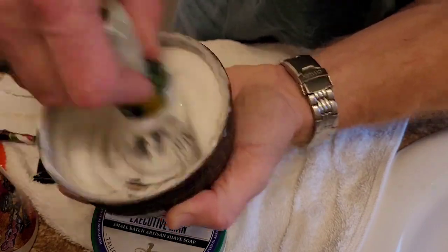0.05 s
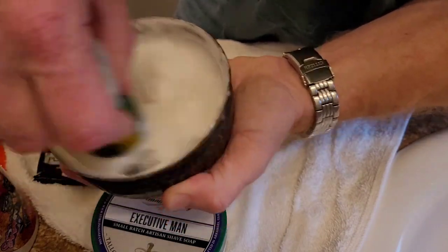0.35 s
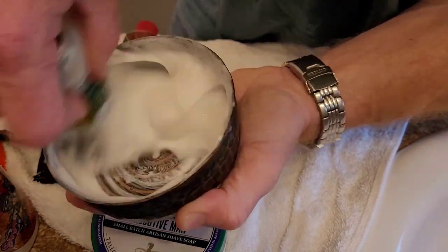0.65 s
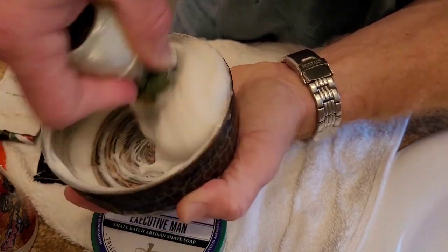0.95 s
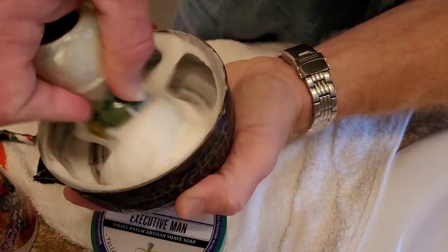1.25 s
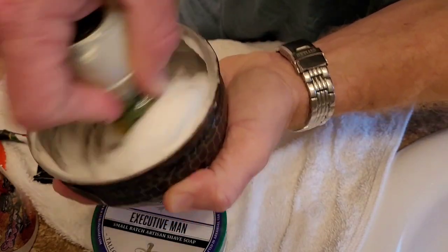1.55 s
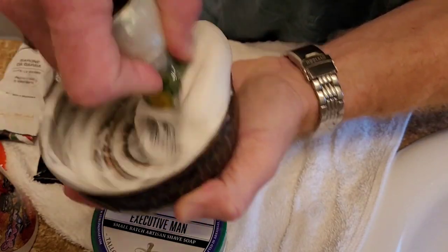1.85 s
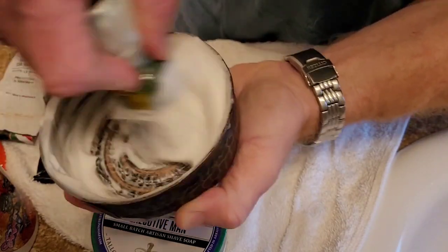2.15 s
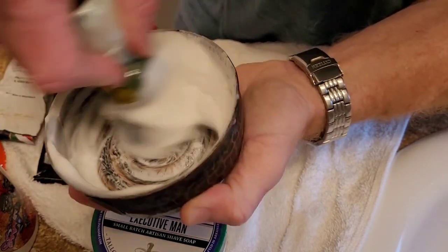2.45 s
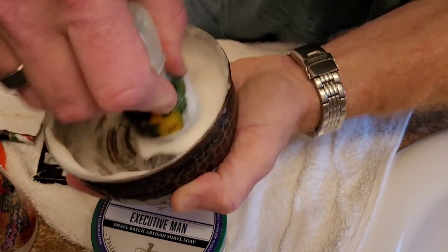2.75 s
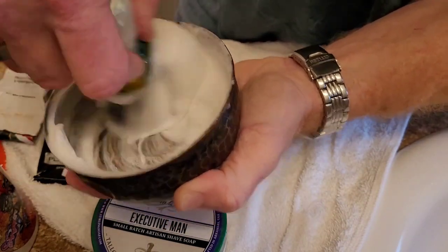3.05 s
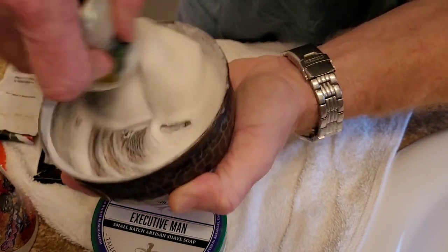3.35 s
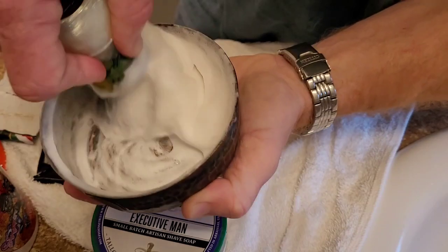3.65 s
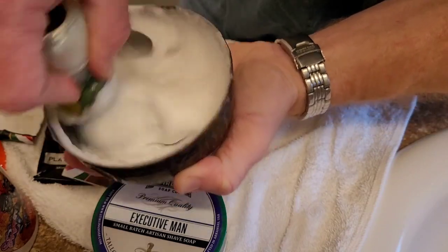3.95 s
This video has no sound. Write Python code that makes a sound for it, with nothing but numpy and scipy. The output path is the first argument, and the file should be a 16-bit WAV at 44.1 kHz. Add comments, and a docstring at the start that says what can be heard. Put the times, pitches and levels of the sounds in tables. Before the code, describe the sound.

A shaving brush swishes lather in a ceramic bowl throughout four seconds, in soft, uneven squelches with a fine fizz. The handle knocks the bowl sharply at about 1.4 seconds, clinks brightly on the rim at 3.2, and clatters more softly at 3.6. Faint watch strap ticks come from the right, and the bowl rubs dully against a palm. Everything is close, in a small, quiet room.

```python
"""A small room, close up: a shaving brush whips lather in a hand-held ceramic bowl.
Each sweep bursts countless tiny bubbles: a wet squelch coloured by the bowl's hollow, with a fine
fizz of bristles on top. A metal watch strap ticks on the right, the bowl rubs in the palm, and the
handle knocks its wall and rim. One soft low bump passes; quiet room tone lies under it all."""
import sys
import numpy as np
from scipy import signal
from scipy.fft import rfft, irfft
from scipy.io import wavfile

SR = 44100
rng = np.random.default_rng(int(sys.argv[2]) if len(sys.argv) > 2 else 0)


def generate_wav(sig):
    """Save sig (samples, or channels by samples) to the path in sys.argv[1] as 16-bit PCM at SR."""
    pcm = np.round(np.clip(np.atleast_2d(sig).T, -1, 1) * 32767).astype(np.int16)
    wavfile.write(sys.argv[1], SR, pcm)


N = 176400
T = np.arange(N) / SR

# The swells of the brush. Each row: time in seconds, squelch level in dB, fizz level in dB.
BRUSH_SWEEPS = [(0, -54.5, -60.5), (.05, -50.5, -57), (.21, -60.5, -74.5), (.3, -53, -59.5),
                (.355, -64.5, -83), (.41, -56.5, -62.5), (.49, -65.5, -72.5), (.62, -52, -61.5),
                (.68, -53.5, -54), (.79, -58.5, -71), (.86, -50, -55.5), (1.018, -56.5, -63),
                (1.07, -49, -52.5), (1.2, -54.5, -63.5), (1.36, -52, -56.5), (1.58, -58.5, -68),
                (1.755, -50.5, -59), (1.825, -76.5, -78), (1.87, -56.5, -67.5), (2.16, -49.5, -56),
                (2.43, -57, -62), (2.65, -51, -58.5), (3.02, -62.5, -69), (3.16, -54.5, -67.5),
                (3.49, -56, -64.5), (3.57, -62, -85), (3.84, -52.5, -60), (3.922, -59, -79),
                (3.94, -53.5, -60)]
# The wet body of the lather. Each row: frequency in Hz, relative level in dB.
SQUELCH_EQ = [(110, -32), (355, -1), (460, -10.5), (950, 1.5), (1400, -10.5), (1750, -4.5), (2900, -17),
              (3700, -34)]
# The bright scratch of the bristles. Each row: frequency in Hz, relative level in dB.
FIZZ_EQ = [(1200, -12.5), (2850, 5), (3900, 0.5), (5500, -0.5), (12300, -7), (16000, -6)]
# Larger air pockets collapsing in the foam. Each row: start in seconds, level in dB.
AIR_POCKETS = [(0.403, -46.5), (.889, -40.5), (1.053, -43.5), (1.86, -49.5), (3.822, -39.5), (3.937, -43)]
# Room tone and hiss. Each row: frequency in Hz, relative level in dB.
ROOM_TONE_EQ = [(50, 8), (95, -11.5), (600, -8.5), (3500, -18.5), (13500, -10)]
# Watch strap links tapping. Each row: start in seconds, level in dB.
STRAP_TICKS = [(.6809, -52), (.7746, -58.5), (0.891, -52.5), (0.9821, -52), (1.095, -49), (1.308, -48.5),
               (1.6667, -55), (1.9004, -47.5), (2.4357, -59), (3.317, -52)]
# The thin glint of a tick. Each row: frequency in Hz, relative level in dB.
TICK_EQ = [(5500, -19), (8400, -9.5), (12500, -2.5)]
# The bowl slipping in the palm. Each row: time in seconds, level in dB.
RUB_LEVELS = [(1.05, -70.5), (1.2, -55), (1.38, -49.5), (1.85, -74), (2.38, -64.5), (2.65, -59.5),
              (2.85, -92.5), (3.18, -57), (3.45, -76.5)]
# The dull tone of skin on ceramic. Each row: frequency in Hz, relative level in dB.
RUB_EQ = [(80, -10.5), (150, -0.5), (370, 4), (1000, -24.5)]
# The handle hitting the bowl. Each row: start in seconds, gain in dB, place from 0 (wall)
# to 1 (rim), low-pass cutoff of the contact in Hz.
HANDLE_KNOCKS = [(1.3832, 0.5, 0.11, 11800), (3.2003, -0.5, 0.92, 14700), (3.2052, -4, 0.75, 13900),
                 (3.2632, -14.5, 0.79, 2550), (3.598, -14, 0.25, 4700), (3.6115, -6, 0.27, 2520),
                 (3.6247, -9.5, 0.095, 2330)]
# The dry clack of contact. Each row: frequency in Hz, relative level in dB on the wall, then on the rim.
CLACK_EQ = [(70, -56, -39.5), (231, -10, -9), (1664, 3.5, 0.5), (3090, -12.5, -1.5), (5740, -28.5, -8.5),
            (9140, -29.5, -18.5), (12370, -19, -6), (15900, -29, -34.5)]
# The bowl's ring. Each row: frequency in Hz, relative level in dB struck on the wall, then on the rim.
BOWL_MODES = [(136.2, -33.5, -52), (219, -30.5, -49), (683.4, -45.5, -23.5), (944, -48.5, -18.5),
              (1205, -29, -48), (1404, -32, -30.5), (1616, -34.5, -16.5), (1847, -36.5, -24),
              (2163, -22, -23), (2270, -39.5, -11), (2535, -36, -22), (2950, -69, -12.5),
              (3410, -38, -27.5), (3760, -43, -18), (4923, -30, -25), (6080, -53, -38), (6560, -41, -17.5),
              (7030, -57, -23.5), (7240, -41, -34)]
# The stereo lean of the whole mix. Each row: frequency in Hz, left minus right in dB.
STEREO_TILT = [(220, 1), (700, 2.5), (2300, 0.5), (6000, 6), (9500, -2)]

HOLLOW_HZ, HOLLOW_Q = [2910, 4600, 7050, 8500], 47   # the bowl's hollow, singing in the fizz
GURGLE_HZ, GURGLE_Q, GURGLE_DB, WANDER_OCTAVES = 948, 17, -7, .3
CLACK_WALL_DB, CLACK_RIM_DB, CLACK_TAIL_DB = -18, -13, -14
MINOR_MODES_PER_HZ, MINOR_MODE_DB = 0.011, 30.5
BOWL_T60_AT_1KHZ_S, MODE_SPLIT, NEIGHBOUR_DB = 0.16, 0.0159, -4
ROOM_T60_S, BRUSH_REVERB_DB, CONTACT_REVERB_DB = 0.27, -2, -19


def from_db(db):
    return 10 ** (np.asarray(db) / 20)


def rms_one(x):
    return x / np.sqrt(np.mean(x ** 2) + 1e-20)


def automation(rows):
    """One fader curve per level column, in straight lines from point to point."""
    times, *columns = np.transpose(rows)
    return [np.interp(T, times, column) for column in columns]


def pan(db):
    """Left and right gains; positive dB leans left."""
    return from_db(np.vstack([db, -db]) / 2)


def decay(start_s, t60):
    """A hard attack, then a fall of 60 dB in t60 seconds."""
    age = T - start_s
    return (age >= 0) * np.exp(-np.log(1000) * np.clip(age / t60, 0, 10))


def eq(x, curve):
    """Minimum-phase EQ, rolled off beyond the curve's ends; comes out at rms 1."""
    hz, db = np.transpose(curve)
    size = 2 * N
    grid = np.maximum(np.fft.rfftfreq(size, 1 / SR), 1)
    skirts = np.minimum(grid / hz[0], 1) ** 2 * np.minimum(hz[-1] / grid, 1) ** 2
    cepstrum = irfft(np.log(skirts * from_db(np.interp(np.log(grid), np.log(hz), db))))
    response = np.exp(2 * rfft(cepstrum[:N], size))
    return rms_one(irfft(rfft(x, size) * response)[..., :N])


def resonate(x, hz, q):
    return signal.lfilter(*signal.iirpeak(hz, q, fs=SR), x)


def stereo_noise(width):
    """Mid-side white noise; width is the side gain."""
    mid, side = rng.standard_normal((2, N))
    return mid + width * side * np.array([[1], [-1]])


def drift(hz):
    """A smooth random wobble, mostly slower than hz, at rms 1."""
    pole = np.exp(-2 * np.pi * hz / SR)
    return rms_one(signal.lfilter([1], [1, -2 * pole, pole * pole], rng.standard_normal(N)))


def grains(per_s, spread_db):
    """Random clicks, most small and a few large."""
    sizes = from_db(spread_db * np.minimum(rng.exponential(1, N), 5))
    return sizes * rng.choice([-1, 1], N) * (rng.random(N) < per_s / SR)


def in_room(x, wet_db):
    """Blends in dense reflections from near surfaces, different at each ear."""
    t = T[:SR // 2]
    echoes = rng.standard_normal((2, len(t))) * np.exp(-np.log(1000) * t / ROOM_T60_S) * (t > .001)
    echoes /= np.sqrt(np.sum(echoes ** 2, axis=1, keepdims=True))
    wet = from_db(wet_db)
    return (x + wet * signal.fftconvolve(x, echoes, axes=1)[:, :N]) / np.hypot(1, wet)


def brush():
    """Bubbles burst in clumps, bristles scratch through the foam, and the odd air pocket collapses."""
    squelch_db, fizz_db = automation(BRUSH_SWEEPS)
    clumps = drift(hz=32.4)   # squelch and fizz flutter together
    bubbles = grains(per_s=5000, spread_db=3.5) * from_db(2 * clumps)
    squelch = eq(bubbles, SQUELCH_EQ)
    squelch = rms_one(squelch + from_db(GURGLE_DB) * gurgle(bubbles * rng.choice([-1, 1], N)))
    bristles = grains(per_s=16000, spread_db=4.5) * from_db(3 * clumps)
    fizz = eq(bristles, FIZZ_EQ)
    fizz = rms_one(fizz + sum(resonate(fizz, hz, HOLLOW_Q) for hz in HOLLOW_HZ))
    collapses = sum(from_db(db) * decay(start_s, t60=0.045) for start_s, db in AIR_POCKETS)
    squish = collapses * eq(rng.standard_normal(N), SQUELCH_EQ)
    lather = squelch * from_db(squelch_db) + squish + fizz * from_db(fizz_db)
    return in_room(np.atleast_2d(lather), BRUSH_REVERB_DB)


def gurgle(bubbles):
    """Each bubble rings at its own pitch, around a centre that wanders as the air pockets change size."""
    octaves = np.linspace(-1, 1, 20)
    pitch = WANDER_OCTAVES * (drift(hz=10) + .5 * rng.standard_normal(N))
    band = np.searchsorted(octaves, pitch)
    rings = (resonate(bubbles * (band == k) + 1e-18, GURGLE_HZ * 2 ** octave, GURGLE_Q)
             for k, octave in enumerate(octaves))
    return rms_one(sum(rings))


def room_tone():
    """A steady, quiet bed of low room noise and hiss."""
    return from_db(-69) * eq(stereo_noise(width=0.42), ROOM_TONE_EQ)


def watch_strap():
    """Steel links tap each other in tiny, very high ticks on the right."""
    envelope = sum(from_db(db) * decay(start_s, t60=0.035) for start_s, db in STRAP_TICKS)
    ticks = envelope * eq(rng.standard_normal(N), TICK_EQ)
    return in_room(ticks * pan(db=-21.5), CONTACT_REVERB_DB)


def palm_rub():
    """The bowl slips against the skin with a dull, grainy friction."""
    rub_db, = automation(RUB_LEVELS)
    rub = from_db(rub_db) * eq(grains(per_s=700, spread_db=2.5), RUB_EQ)
    return in_room(rub * pan(db=0), CONTACT_REVERB_DB)


def handle_knocks():
    """The handle strikes the bowl: a clack layered with a short ring, brighter on the rim."""
    out = np.zeros((2, N))
    t = T[:SR // 2]
    # the bowl's minor modes: scattered narrow peaks, stronger towards the top
    bins = N // 2 + 1
    peaks = from_db(MINOR_MODE_DB) * rng.exponential(1, bins) * np.linspace(0, 1, bins)
    minor_modes = 1 + peaks * (rng.random(bins) < MINOR_MODES_PER_HZ * SR / N)
    for start_s, db, place, contact_hz in HANDLE_KNOCKS:
        hit = clack(place, minor_modes)[:, :len(t)] + bowl_ring(t, place)
        hit = signal.sosfilt(signal.butter(1, contact_hz, fs=SR, output="sos"), hit)
        start = int(start_s * SR)
        out[:, start:start + len(t)] += from_db(db) * hit[:, :N - start]
    return in_room(out, CONTACT_REVERB_DB)


def wall_to_rim(place, wall_db, rim_db):
    return wall_db + place * (rim_db - wall_db)


def clack(place, minor_modes):
    """The contact excites many minor modes at once: a dry snap with a softer tail."""
    curve = [(hz, wall_to_rim(place, wall_db, rim_db)) for hz, wall_db, rim_db in CLACK_EQ]
    noise = eq(irfft(rfft(stereo_noise(width=0.5)) * minor_modes), curve)
    envelope = np.hypot(decay(0, t60=0.055), from_db(CLACK_TAIL_DB) * decay(0, t60=0.23))
    return noise * envelope * from_db(wall_to_rim(place, CLACK_WALL_DB, CLACK_RIM_DB))


def bowl_ring(t, place):
    """The bowl is not quite round, so each upper mode rings as a beating cluster of three."""
    out = 0
    for hz, wall_db, rim_db in BOWL_MODES:
        t60 = BOWL_T60_AT_1KHZ_S * (hz / 1000) ** -0.062   # high modes die a little sooner
        attack = 1 - np.exp(-2 * hz * t)
        envelope = from_db(wall_to_rim(place, wall_db, rim_db)) * attack * np.exp(-np.log(1000) * t / t60)
        shimmer = np.tanh(hz / 2000)   # high modes beat deeper and spread wider
        for neighbour in (-1, 0, 1):
            phase = neighbour * rng.uniform(0, 2 * np.pi)
            ear_phase = 1.19 * shimmer * rng.standard_normal((2, 1))
            detune = 1 + neighbour * MODE_SPLIT * rng.uniform(0.52, 1)
            gain = from_db(NEIGHBOUR_DB) * shimmer if neighbour else 1
            out = out + gain * envelope * np.sin(2 * np.pi * hz * detune * t + phase + ear_phase)
    return out


def low_bump(centre_hz=49.3, peak_s=2.632, width_s=0.055):
    """One soft swell of octave-wide rumble, leaning left."""
    band = signal.butter(2, [centre_hz / np.sqrt(2), centre_hz * np.sqrt(2)], "band", fs=SR, output="sos")
    rumble = rms_one(signal.sosfilt(band, rng.standard_normal(N)))
    swell = np.exp(-.5 * ((T - peak_s) / width_s) ** 2)
    return from_db(-59.5) * rumble * swell * pan(db=7.5)


def scene():
    """The mix: brush, watch and bowl over a quiet room."""
    return brush() + room_tone() + watch_strap() + palm_rub() + handle_knocks() + low_bump()


def record(dry):
    """The master: each side gets its own colour, peaks clip at full scale, and the very top is cut."""
    hz, db = np.transpose(STEREO_TILT)
    tilt_db = np.interp(np.fft.rfftfreq(N, 1 / SR), hz, db)
    tilted = irfft(rfft(dry) * pan(tilt_db))
    high_cut = signal.ellip(10, .2, 80, 16300, fs=SR, output="sos")
    return signal.sosfilt(high_cut, np.clip(tilted, -1, 1))


dry = scene()
out = record(dry)
generate_wav(out)
```